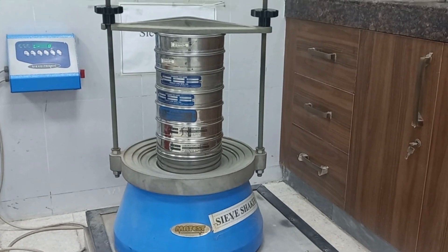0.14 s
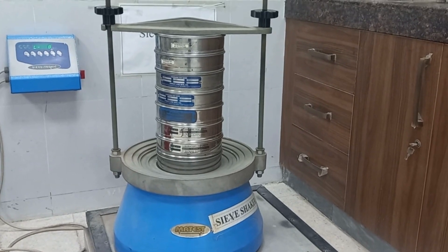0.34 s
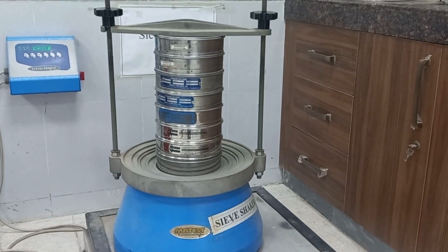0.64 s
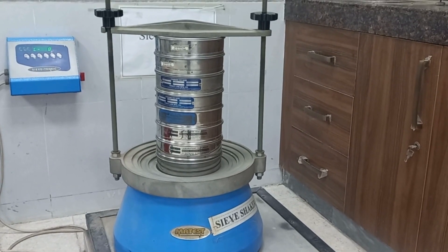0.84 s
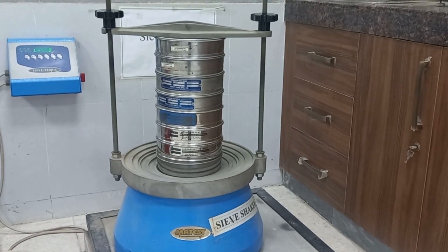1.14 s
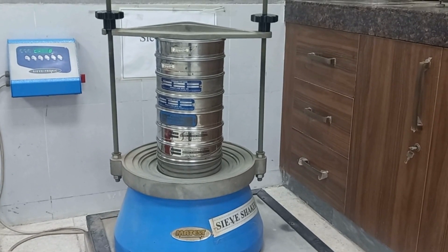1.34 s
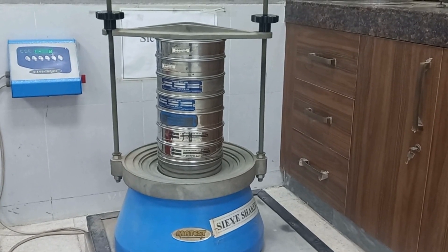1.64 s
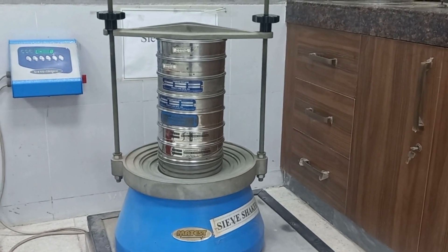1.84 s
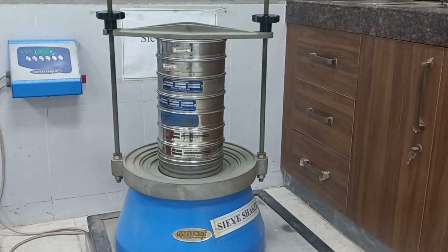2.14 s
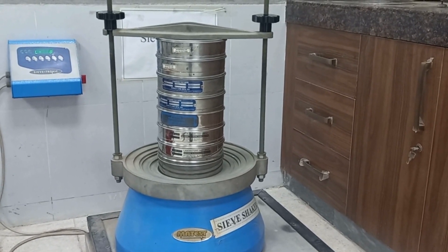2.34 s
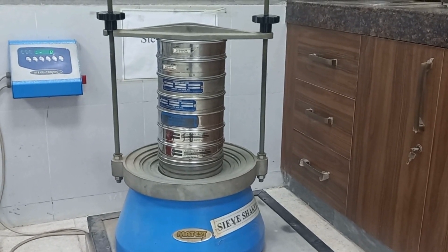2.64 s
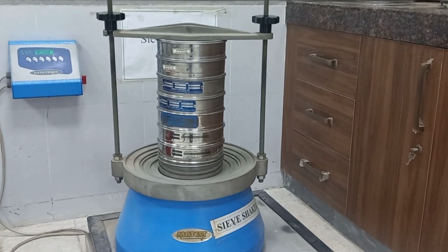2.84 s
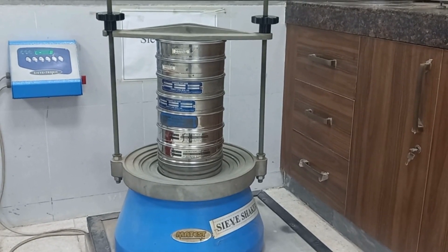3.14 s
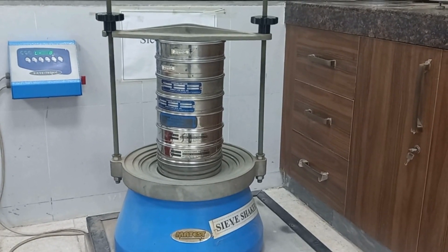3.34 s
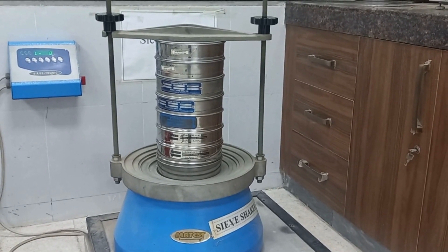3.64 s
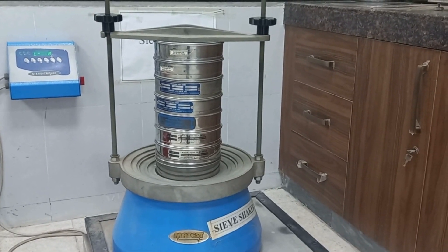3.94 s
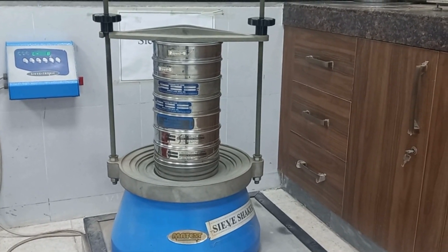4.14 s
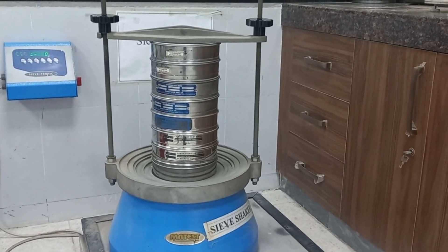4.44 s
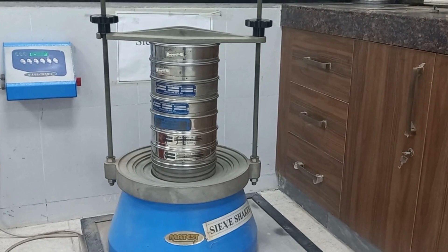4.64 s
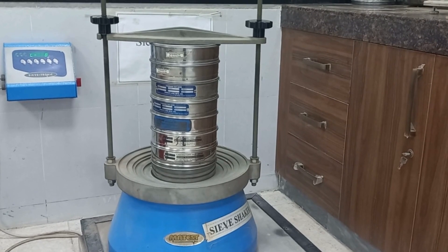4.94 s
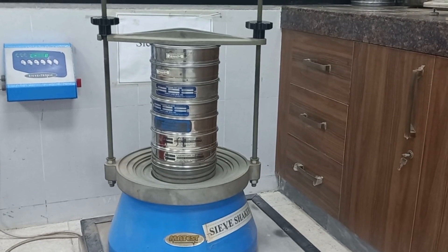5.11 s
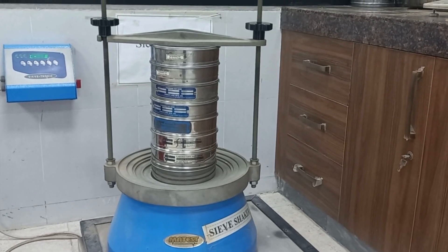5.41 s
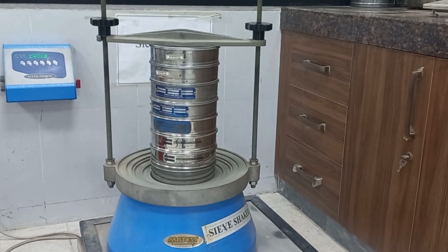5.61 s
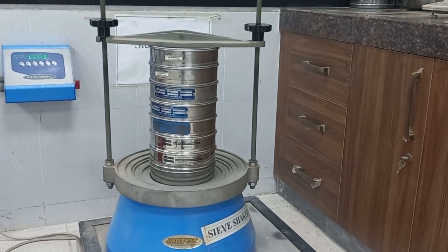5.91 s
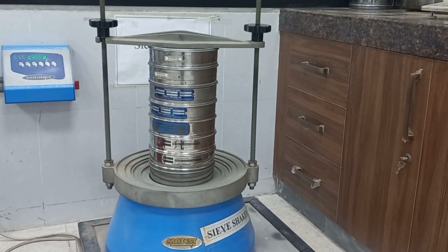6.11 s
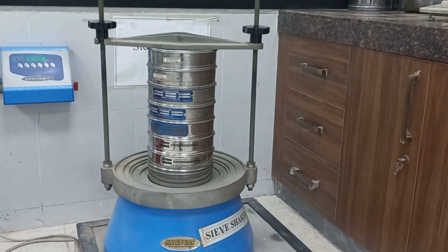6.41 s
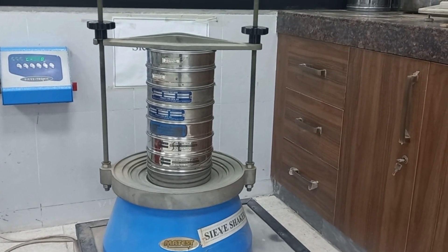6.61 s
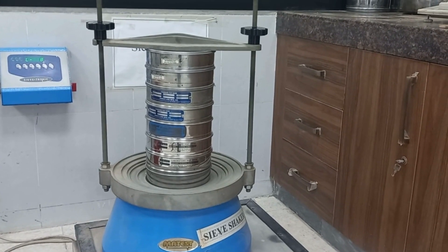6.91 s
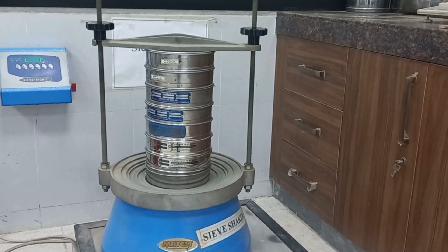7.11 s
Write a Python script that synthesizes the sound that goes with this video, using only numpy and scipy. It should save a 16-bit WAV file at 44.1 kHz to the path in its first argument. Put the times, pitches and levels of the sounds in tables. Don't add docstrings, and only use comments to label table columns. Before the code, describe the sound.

Sieve shaker running in a tiled lab: constant mains hum, bright sandy hiss, faint high rim ringing, ending suddenly in quiet room tone.

```python
import sys
import numpy as np
from scipy import signal
from scipy.fft import rfft, irfft
from scipy.io import wavfile

SR = 44100
rng = np.random.default_rng(int(sys.argv[2]) if len(sys.argv) > 2 else 0)


def linear_from_db(decibels):
    return 10 ** (np.asarray(decibels, float) / 20)


def unload_audio(sound):
    columns = np.transpose(np.atleast_2d(sound))
    steps = np.round(np.clip(columns, -1, 1) * 32767)
    wavfile.write(sys.argv[1], SR, steps.astype(np.int16))


N = 320166
T = np.arange(N) / SR
HZ = np.fft.rfftfreq(N, 1 / SR)
MAINS_HZ, START_TURN = 50.1, .067
CUT_S = 7.1775
USUAL_HUM_DB = -33.6


def evened(x):
    return x / np.sqrt(np.mean(x ** 2) + 1e-20)


def read(points, at_hz=HZ):
    hz, value = np.transpose(points)
    return np.interp(np.log(at_hz + 1), np.log(hz + 1), value)


def modes(at_hz, shapes):
    power = 0
    for hz, (width_hz, db) in zip(at_hz, shapes):
        power = power + linear_from_db(2 * db) / (1 + (2 * (HZ - hz) / width_hz) ** 2)
    return power


def wander(top_hz):
    coarse_s = T[::63]
    count = len(coarse_s)
    hz = np.fft.rfftfreq(count, coarse_s[1])
    spectrum = rfft(rng.standard_normal(count)) / (1 + (hz / top_hz) ** 2)
    return np.interp(T, coarse_s, evened(irfft(spectrum, count)))


# frequency in Hz, left minus right in dB.
TILT = [(30, .3), (100, 3), (300, 0), (1100, 1.5), (2000, -0.5), (3700, -5), (6500, -5.5), (8100, -3.5),
        (8400, -6), (9500, -10.5), (12500, 0)]
# frequency in Hz, left-right likeness from 0 to 1.
LIKENESS = [(30, .8), (100, .9), (330, .9), (770, .65), (1200, .3), (3000, .3), (6800, .12), (7000, .75),
            (7700, .94), (8400, .92), (10800, .93), (11800, .97), (13000, .99)]
# frequency in Hz, lead of the left port in radians.
LEAD = [(860, .1), (1380, .2), (1810, 3.7), (2070, .7), (2330, -.2), (2840, .3), (3620, 2.7), (4740, 2),
        (5250, -2), (6700, 0)]


def heard(power, drive):
    a, b = rfft(drive, axis=1)
    same = np.clip(read(LIKENESS), -1, 1)
    left = a * linear_from_db(read(TILT) / 2) * np.exp(1j * read(LEAD))
    right = (same * a + np.sqrt(1 - same ** 2) * b) * linear_from_db(-read(TILT) / 2)
    pair = irfft(np.array([left, right]) * np.sqrt(power), N, axis=1)
    return pair / np.sqrt(np.mean(pair.mean(0) ** 2))


def grains(throw_db, lag_turns, flicker_db, size_db):
    landing_db = throw_db * np.cos(2 * np.pi * (MAINS_HZ * T + START_TURN - lag_turns))
    size = linear_from_db(size_db * np.minimum(rng.exponential(1, (2, N)), 6))
    return rng.standard_normal((2, N)) * size * linear_from_db(landing_db + flicker_db * wander(14))


# time in seconds, level of the magnet hum in dB.
THROW = [(0.0, -33.5), (0.69, -34), (1.01, -35.5), (1.25, -34), (1.6, -35), (2.1, -34.5), (2.55, -34.5),
         (2.95, -33.5), (3.25, -33.5), (3.7, -34), (3.9, -33.5), (4.7, -32.5), (5.0, -33.6), (5.33, -34),
         (5.5, -33.5), (6.2, -33.5), (6.45, -33.5), (7.1, -33.5)]


def follows(level_db, share):
    hum_db = np.interp(T, *np.transpose(THROW))
    return linear_from_db(level_db + share * (hum_db - USUAL_HUM_DB))


def spells(rows, edge_s):
    coarse_s = T[::64]

    def step(at_s):
        return .5 + .5 * np.tanh((coarse_s - at_s) / edge_s)

    gain = sum(linear_from_db(db) * (step(start) - step(start + length)) for start, length, db in rows)
    return np.interp(T, coarse_s, gain)


def ringing(rows, spell_db):
    total = 0
    for hz, width_hz, db in rows:
        tone = heard(modes([hz], [(width_hz, db)]) ** 1.64, grains(0.43, 0.59, 0.42, 3.6))
        total = total + linear_from_db(db + spell_db * wander(3.9)) * np.sqrt(width_hz) * tone
    return evened(total)


def room(wet_db, t60_s):
    t = np.arange(SR // 2) / SR
    tail = rng.standard_normal(len(t)) * linear_from_db(-60 * t / t60_s) * (t > .003)
    reflected = rfft(tail / np.linalg.norm(tail), N) / np.hypot(1, HZ / 5000)
    return abs(1 + linear_from_db(wet_db) * reflected) ** 2


# frequency in Hz, level in dB per Hz.
BENCH = [(30, -4), (55, -2), (200, -6), (430, 0), (850, -5), (1550, -13), (2700, -16), (4600, -26),
         (7300, -34), (10400, -35), (14000, -42)]


def bench():
    hum = linear_from_db(-47) * np.sin(4 * np.pi * MAINS_HZ * T + 1.2)
    return hum + linear_from_db(-47) * heard(linear_from_db(2 * read(BENCH)), rng.standard_normal((2, N)))


# time in seconds, peak in dB.
KNOCKS = [
    (6.9847, -25.5),
]


def knocks():
    total = 0
    for at_s, peak_db in KNOCKS:
        u = ((T - at_s) / .0006) ** 2
        total = total - linear_from_db(peak_db) * (1 - u) * np.exp(-u)
    return total


# multiple of the mains, level in dB rms.
HUM_PARTIALS = [(1, -69.5), (3, -61.5), (6, -58), (7, -57), (8, -57)]


def magnet():
    turn = 2 * np.pi * (MAINS_HZ * T + START_TURN)
    port_lead_rad = np.array([[.03], [-.03]])
    pull = np.cos(2 * turn + port_lead_rad + 0.027 * wander(1.5))
    hum = -linear_from_db(0.2) * follows(USUAL_HUM_DB, 1) * pull
    for multiple, db in HUM_PARTIALS:
        level = linear_from_db(db + 2.45 * wander(12.0))
        phase = 2 * np.pi * rng.random() + 0.31 * wander(1.1)
        hum = hum + level * np.sin(multiple * turn + phase)
    return np.sqrt(2) * hum * linear_from_db(np.array([[.45], [-.45]]))


# frequency in Hz, level in dB per Hz.
RUMBLE = [(20, -9), (50, -6.5), (85, 1), (130, -1), (215, -10), (270, -5), (400, -0.5), (550, -6),
          (640, -8.5), (900, -6.5), (1100, -25), (1600, -48)]
HOUSING_HZ = [282, 402, 421, 478, 520, 547, 699]
# width in Hz, level in dB over the rumble top.
HOUSING_SHAPES = [(6, 4.5), (13, -1), (14, 1), (9.1, -3.5), (30, -0.5), (14, -5), (12, 2)]


def housing():
    colour = linear_from_db(2 * read(RUMBLE)) + modes(HOUSING_HZ, HOUSING_SHAPES)
    return follows(0, 0.73) * linear_from_db(-45) * heard(colour, grains(1.0, 0.96, 1.0, 0.52))


# start in seconds, length in seconds, level in
# dB.
BASE_SPELLS = [(0.02, 0.33, -51), (0.42, 0.1, -54), (0.7, .16, -57), (0.94, .14, -53), (1.17, 0.089, -52),
               (1.364, .07, -54), (1.59, 0.16, -53), (1.97, .07, -53), (2.1, 0.24, -57), (2.4, .13, -60),
               (2.75, .18, -53), (3.0, 0.083, -55), (3.136, .18, -51), (3.477, 0.17, -54),
               (3.81, 0.17, -55), (4.16, 0.16, -51), (4.5, 0.21, -52.5), (4.89, 0.21, -54.5),
               (5.28, 0.23, -56), (5.69, .075, -51), (5.82, 0.13, -55), (6.1, 0.17, -56), (6.35, 0.27, -51),
               (6.784, 0.14, -53), (7.0, .17, -59)]


def base():
    mode_tone = np.sqrt(2) * np.sin(2 * np.pi * 197 * T + 1.3 * wander(6.4))
    turn, width_hz = 2 * np.pi * 217 * T, 24
    shudder = wander(width_hz) * np.cos(turn) + wander(width_hz) * np.sin(turn)
    gain = linear_from_db(-69.5) + linear_from_db(-1.5) * spells(BASE_SPELLS, edge_s=0.014)
    return gain * (mode_tone + linear_from_db(-4.5) * shudder)


# frequency in Hz, width in Hz, level in dB.
ROD_MODES = [(808, 8, 0), (796, 14, -5)]
# start in seconds, length in seconds, level in dB.
ROD_SPELLS = [(0.029, 0.26, -49), (0.39, 0.17, -48), (0.63, 0.082, -52), (0.943, 0.051, -51),
              (1.362, 0.036, -57), (1.827, 0.037, -50), (1.951, 0.052, -43), (2.138, 0.092, -51),
              (2.37, 0.12, -54), (2.631, 0.1, -60), (2.863, 0.195, -50), (3.21, 0.24, -50),
              (3.55, 0.12, -45.5), (3.874, 0.3, -51), (4.373, 0.042, -53), (4.491, 0.057, -52),
              (4.668, 0.14, -53), (5.184, 0.26, -54), (5.852, 0.03, -54), (5.948, 0.03, -54),
              (6.137, 0.042, -47), (6.446, 0.037, -41), (6.57, 0.036, -54), (6.8, 0.15, -60),
              (7.071, 0.083, -44)]


def rods():
    gain = linear_from_db(-58) + linear_from_db(-4.0) * spells(ROD_SPELLS, edge_s=0.014)
    return gain * ringing(ROD_MODES, spell_db=.5)


# frequency in Hz, width in Hz, level in dB.
RIM_MODES = [(7507, 22, -3.5), (7588, 18, -3), (7634, 16, 0), (7680, 30, -4.5), (7620, 150, -10)]
# start in seconds, length in seconds, level in dB.
RIM_SPELLS = [(0.01, .09, -41), (0.19, .1, -42), (0.355, .14, -48), (0.525, .45, -40), (1.285, 0.13, -32),
              (1.405, 0.18, -33), (1.87, 0.12, -36), (2.01, 0.088, -36), (2.33, .04, -37),
              (2.44, 0.16, -35), (2.75, .18, -37), (3.02, .24, -39), (3.43, .2, -42), (3.75, 0.074, -43),
              (3.93, 0.17, -46), (4.175, .1, -41), (4.31, 0.25, -39), (4.6, 0.085, -27),
              (4.825, 0.095, -40), (4.94, 0.091, -27), (5.03, .3, -36), (5.56, .1, -25), (5.68, 0.5, -35),
              (6.07, 0.097, -47), (6.26, .07, -39), (6.5, 0.19, -36), (6.94, 0.17, -35)]


def rim():
    gain = follows(-42.5, 0.79) + linear_from_db(-8.5) * spells(RIM_SPELLS, edge_s=0.018)
    return gain * ringing(RIM_MODES, spell_db=2.4)


# frequency in Hz, level in dB per Hz.
SHOWER = [(530, -33), (900, -16), (1160, -9.5), (1350, -7), (1750, -3), (2250, -6.5), (3050, 0),
          (3320, -2.5), (4050, -2.5), (7400, -5), (7900, -4), (10000, -5.5), (12500, -8.5), (16500, -18.5)]
WALLS_HZ = [1265, 1300, 1387, 1525, 1630, 1895, 2075, 2186, 2390, 2498, 2660, 2770, 3245, 3480, 3573, 3800,
            4370]
# width in Hz, level in dB over the shower top.
WALL_SHAPES = [(14, 0), (30, -3.5), (25.3, 4), (30, 0.5), (42, 2), (12, 2.5), (27.6, 5.5), (9.3, 1.5),
               (20, 0), (14, -2.5), (31, 0.5), (14, -1), (41, 1), (80, -2), (22, 4), (100, -5.5), (30, -2)]


def shower():
    colour = (linear_from_db(2 * read(SHOWER)) + modes(WALLS_HZ, WALL_SHAPES)) * room(wet_db=-13, t60_s=.35)
    hail = heard(colour, grains(0.63, 0.71, 0.54, 1.36))
    dust_pass = 1 / (1 + (8300 / (HZ + 1)) ** 8)
    dust = irfft(rfft(hail, axis=1) * dust_pass, N, axis=1)
    coarse = hail - dust
    return linear_from_db(2.5) * follows(-33, 1) * coarse + linear_from_db(7.5) * follows(-39, 0.84) * dust


def scene():
    after_s = np.maximum(T - CUT_S, 0)
    before = np.where(T < CUT_S, 1, linear_from_db(-30 - 3000 * after_s))
    shaker = magnet() + housing() + base() + rods() + shower() + rim() + knocks()
    return shaker * before + bench() * (T >= CUT_S)


# frequency in Hz, share of frames from 0 to 1.
INVERTED = [(6800, 0), (7000, .15), (7500, .15), (7700, 0), (10500, .01), (11300, .07), (12100, .09),
            (12700, .17), (13400, .17), (14100, .15), (14800, .14), (15500, .06)]
# start in seconds, length in seconds, frequency in Hz.
FLIPS = [(.106, .017, 7900), (.312, .116, 13400), (.324, .119, 14100), (.748, .061, 12700),
         (1.27, .061, 12700), (1.375, .029, 7900), (1.627, .035, 7900), (1.708, .017, 7900),
         (2.07, .012, 7900), (2.391, .015, 7900), (2.71, .017, 7900), (3.406, .029, 7900),
         (3.52, .012, 7900), (3.58, .06, 15500), (3.909, .015, 7900), (4.544, .055, 15500),
         (4.643, .055, 15500), (4.948, .046, 15500), (5.189, .049, 15500), (5.2, .044, 7900),
         (5.334, .061, 7900), (6.013, .128, 15500), (6.039, .035, 7900), (6.225, .02, 7900),
         (6.315, .023, 7900), (6.849, .015, 7900)]


def panned_treble(x, pan_db):
    band_hz = 32 * SR / 2048
    hz, t, z = signal.stft(x, SR, nperseg=512, noverlap=384)
    band = (hz / band_hz).astype(int)
    frame = (t * SR / 1024 + .55).astype(int)
    draws = rng.random((2, frame.max() + 1, band.max() + 1))
    chance, pan = draws[:, frame][:, :, band].transpose(0, 2, 1)
    share = read(INVERTED, (band + .5) * band_hz)[:, None]
    flip = (chance < share) & (t < CUT_S)
    for start, length, at_hz in FLIPS:
        flip |= np.outer(band == int(at_hz / band_hz), (t >= start) & (t <= start + length))
    panned = (hz > 6890) & (hz < 11714)
    pan = pan_db * (2 * pan - 1) * panned[:, None]
    sign = np.where(flip, -1, 1)
    z = z * np.array([linear_from_db(pan / 2), linear_from_db(-pan / 2) * sign])
    return signal.istft(z, SR, nperseg=512, noverlap=384)[1][:, :N]


def band_limit(x):
    return signal.sosfilt(signal.butter(12, 16700, fs=SR, output="sos"), x)


def record(dry):
    panned = panned_treble(dry, pan_db=1.7)
    limited = irfft(rfft(panned, axis=1) * (HZ < 15740), N, axis=1)
    return band_limit(limited)


dry = scene()
out = record(dry)
unload_audio(out)
```